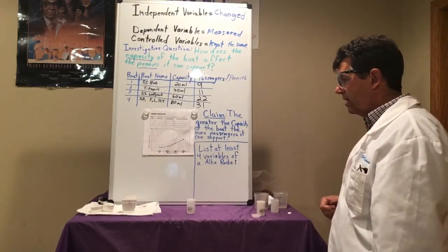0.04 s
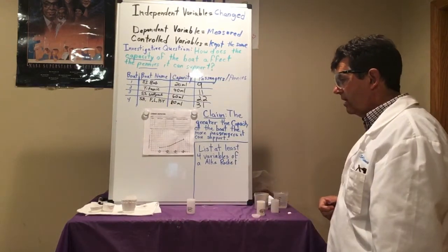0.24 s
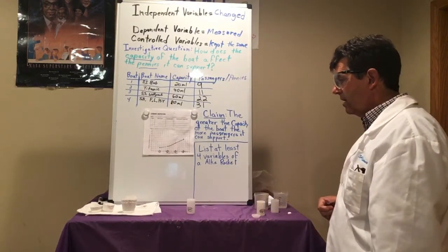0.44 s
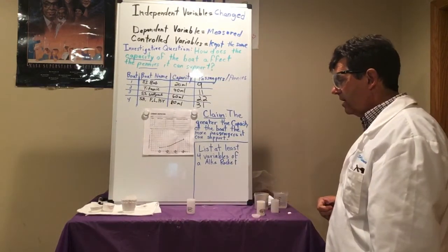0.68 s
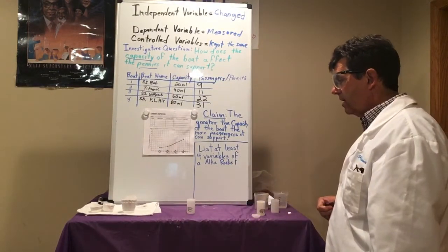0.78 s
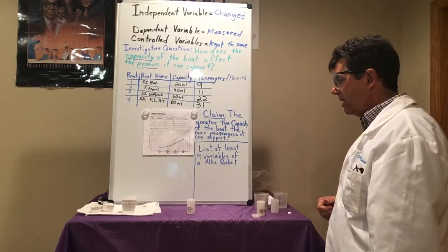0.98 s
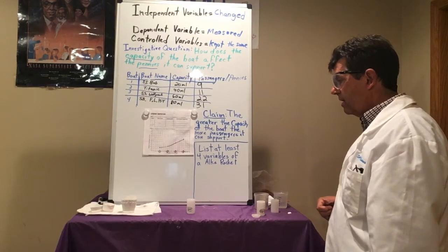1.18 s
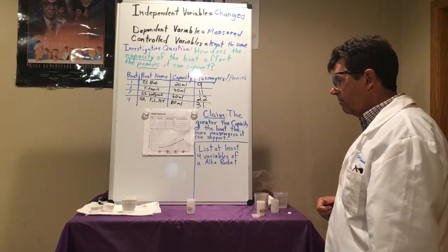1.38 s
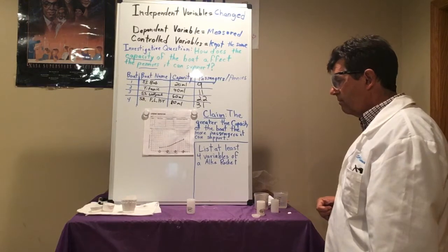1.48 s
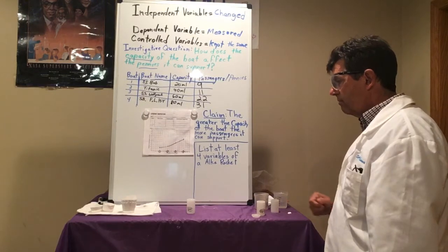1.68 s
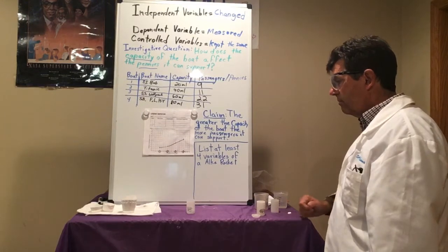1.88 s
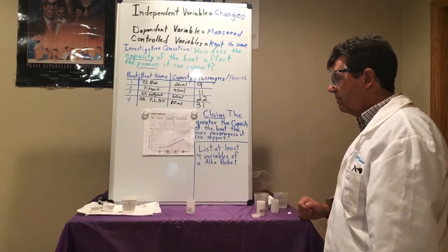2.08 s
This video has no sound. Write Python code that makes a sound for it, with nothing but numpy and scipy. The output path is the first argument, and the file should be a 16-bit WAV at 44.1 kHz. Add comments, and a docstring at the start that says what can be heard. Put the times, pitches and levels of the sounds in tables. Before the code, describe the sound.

A film canister's lid pops off with one sharp hollow pop in a quiet, humming room

```python
"""Ventilation rumbles and hums in a quiet classroom, as low noise and unsteady tones, under faint hiss.
A film canister stands on a table until the gas of a fizzing tablet blows its lid off: filtered impulses
make the lid's bright crack over the rim, the gas's one hollow pop and a thin tick just after.
Table, board and walls throw the pop back before the room rings out as decaying noise and damped sines.
The microphone adds the hiss and a small treble resonance."""
import sys
import numpy as np
from scipy import signal
from scipy.fft import rfft, irfft, next_fast_len
from scipy.io import wavfile
from scipy.ndimage import map_coordinates

SR = 44100
rng = np.random.default_rng(int(sys.argv[2]) if len(sys.argv) > 2 else 0)


def dump_mix(stems):
    """Bounce the given channels to the path in sys.argv[1] as a 16-bit WAV at rate SR."""
    frames = np.atleast_2d(stems).T  # one column per channel
    limited = np.clip(frames, -1, 1)  # hard clip at full scale
    pcm = np.round(limited * 32767).astype(np.int16)
    wavfile.write(sys.argv[1], SR, pcm)


N = 94197


def amp(db):
    """Decibels to gain."""
    return 10 ** (np.asarray(db) / 20)


def unit(x):
    """Scale to rms 1."""
    return x / np.sqrt(np.mean(x ** 2) + 1e-20)


def along(points, hz):
    """Interpolate (Hz, value) points on a log-frequency axis."""
    point_hz, value = np.transpose(points)
    return np.interp(np.log(hz + 1), np.log(point_hz + 1), value)


def filtered(x, response):
    """Multiply the spectrum of x by a response of frequency, padded against wrap-around."""
    size = 2 * next_fast_len(N)
    spectrum = rfft(x, size) * response(np.fft.rfftfreq(size, 1 / SR))
    return irfft(spectrum, size)[:N]


def causal(db):
    """Minimum-phase response with these levels: it never rings ahead of its cause."""
    cepstrum = irfft(db * np.log(10) / 20)
    half = len(cepstrum) // 2
    cepstrum[1:half] *= 2
    cepstrum[half + 1:] = 0
    return np.exp(rfft(cepstrum))


def delayed(x, delay_s):
    """Shift x later, cut to the scene's length."""
    return np.pad(x, (max(round(delay_s * SR), 0), 0))[:N]


def noise(spectrum):
    """Coloured noise of rms 1."""
    return unit(filtered(rng.standard_normal(N), lambda hz: amp(along(spectrum, hz))))


def wobble(knots_per_s):
    """Smooth random curve through random knots."""
    knots = rng.standard_normal(int(N * knots_per_s / SR) + 4)
    return map_coordinates(knots, [np.arange(N) * knots_per_s / SR])


# Ventilation rumble. Each row: frequency in Hz, relative density in dB per Hz.
RUMBLE = [(25, -38.5), (36, -32), (55, -4), (64, -9), (80, 1), (100, -7.5), (155, -4.5), (185, -12),
          (260, -15.5), (330, -16.5), (460, -28.5), (600, -26.5), (1000, -39.5), (2500, -58), (8000, -86)]
RUMBLE_DB = -56
# Fan and mains tones. Each row: frequency in Hz, level in dB rms, unsteadiness from 0 to 1.
HUM = [(81, -62.5, .7), (120.9, -60.5, 0.4), (289.6, -61.5, 0.1)]


def ventilation():
    """Low air noise plus tones whose amplitude and phase wander at random."""
    t = np.arange(N) / SR
    air = amp(RUMBLE_DB) * noise(RUMBLE)
    for hz, db, unsteady in HUM:
        swing = 1 + unsteady * (wobble(6.87) + 1j * wobble(21))
        carrier = np.exp(2j * np.pi * (hz * t + rng.random()))
        air = air + amp(db) * unit(np.real(swing * carrier))
    return air


# Early echoes from board, table, ceiling and walls. Each row: delay in seconds, level in dB.
ECHOES = [(.0043, -2), (.0095, 0), (.0126, -2), (0.0157, -5), (0.0186, -1.5), (0.0293, -3.5), (.0338, -4.5),
          (0.0369, -1)]


def echoes(x):
    """Single returns from the nearest surfaces."""
    return sum(amp(db) * delayed(x, delay_s) for delay_s, db in ECHOES)


# Decay of the room's ring. Each row: frequency in Hz, t60 in seconds.
ROOM_T60 = [(130, 0.36), (330, 0.35), (650, 0.3742), (1050, 0.51), (1900, 0.42), (2800, 0.38), (5200, .40),
            (9000, 0.36), (14000, 0.27)]
# Colour of the room's ring. Each row: frequency in Hz, relative level in dB.
ROOM_COLOUR = [(150, -0.13), (400, -0.13), (750, -0.31), (1050, -1.5), (1400, -1.5), (2000, 1),
               (3000, 0.23), (6000, 0.076), (14000, 0)]
ROOM_RISE_S = 0.0047


def room(x):
    """Diffuse ring: noise that builds up, then dies at its own speed at each frequency."""
    hz, t, grains = signal.stft(rng.standard_normal(SR), SR, nperseg=256)
    colour_db = along(ROOM_COLOUR, hz)[:, None]
    decay_db = 60 * t / along(ROOM_T60, hz)[:, None]
    rise = 1 - np.exp(-t / ROOM_RISE_S)
    tail = signal.istft(grains * amp(colour_db - decay_db) * rise, SR, nperseg=256)[1]
    return signal.fftconvolve(x, tail / np.linalg.norm(tail))[:N]


def ring(modes, rise_s):
    """Damped sines at random phase that swell in."""
    t = np.arange(N) / SR
    x = np.zeros(N)
    for hz, db, t60_s in modes:
        decay = np.exp(-np.log(1000) * t / t60_s)
        x += amp(db) * decay * np.sin(2 * np.pi * (hz * t + rng.random()))
    return x * (1 - np.exp(-t / rise_s))


def burst(spectrum, resonances=()):
    """One sharp push, an impulse through a colour and its resonances, at energy 1."""
    def response(f):
        lift_db = sum(db / (1 + (2 * (f - hz) / width_hz) ** 2) for hz, width_hz, db in resonances)
        return causal(along(spectrum, f) + lift_db)

    x = filtered(np.ones(1), response)
    return x / np.linalg.norm(x)


SCRAPE_T60_S, SCRAPE_SHARE = 0.0066, .35  # share of energy, 0-1


def scraped(x):
    """The lid's edge drags briefly on contact: decaying noise roughens the click."""
    t = np.arange(SR // 10) / SR
    drag = rng.standard_normal(len(t)) * np.exp(-np.log(1000) * t / SCRAPE_T60_S)
    rough = signal.fftconvolve(x, drag / np.linalg.norm(drag))[:N]
    return np.sqrt(1 - SCRAPE_SHARE) * x + np.sqrt(SCRAPE_SHARE) * rough


# Colour of the tick. Each row: frequency in Hz, relative level in dB.
TAP = [(2000, 3), (5000, -6.5), (9000, -4.5), (14000, -3), (15600, -4)]
# Ring of the plastic. Each row: frequency in Hz, level in dB before decay and swell, t60 in seconds.
LID_MODES = [(8820, -43, 0.033), (9120, -41, 0.026)]
TAP_S, TAP_DB, LID_RISE_S = 1.8971, -15, 0.0055


def lid_tap():
    """A thin scraped tick and a brief ring of the plastic's damped modes."""
    return scraped(amp(TAP_DB) * burst(TAP)) + ring(LID_MODES, LID_RISE_S)


# Colour of the plastic lid's snap. Each row: frequency in Hz, relative level in dB.
SNAP = [(500, 6.5), (2500, 11), (4200, 0), (5500, -4), (6600, -6), (7400, -12.5), (9000, -10),
        (10000, -11.5), (13500, -14), (15600, -23)]
SNAP_DB, SNAP_ECHO_DB, SNAP_ROOM_DB = -10, -6, 3.5


def lid_snap():
    """The lid jumps the rim with a bright crack, echoed and ringing in the room."""
    snap = amp(SNAP_DB) * burst(SNAP)
    early = amp(SNAP_ECHO_DB) * echoes(scraped(snap))
    return scraped(snap) + early + amp(SNAP_ROOM_DB) * room(snap)


# Colour of the puff of gas. Each row: frequency in Hz, relative level in dB.
PUFF = [(60, -45), (110, -22.5), (160, -5.5), (270, -0.5), (420, -1.5), (700, -3.5), (900, 0.5), (1120, -2),
        (1450, -1), (1980, 1), (2230, -13), (3150, -22.5), (3650, -41), (8000, -68)]
# Hollow resonances of canister and surroundings. Each row: frequency in Hz, width in Hz, lift in dB.
HOLLOW = [(155, 34, 4), (275, 28, 5), (548.5, 28, 10), (886, 35, 5.5), (1282, 32, 5), (1595, 29, 7.5),
          (1904, 60, 3.5), (2360, 81, 5.5)]
# Room modes that ring on. Each row: frequency in Hz, level in dB before decay and swell, t60 in seconds.
LINGER = [(549, -32.5, 0.34), (1038, -38.5, 0.85), (1950, -35, 0.41)]
POP_S, GAS_LAG_S = 1.8857, .0008  # lid lets go; gas follows
POP_DB, ROOM_DB = 3, 8.5


def gas_pop():
    """One hollow pressure pulse, its echoes and the room's ring."""
    puff = amp(POP_DB) * burst(PUFF, HOLLOW)
    return puff + echoes(puff) + amp(ROOM_DB) * room(puff) + ring(LINGER, ROOM_RISE_S)


def scene():
    """Ventilation, then snap, pop and tick over it."""
    snap = delayed(lid_snap(), POP_S)
    pop = delayed(gas_pop(), POP_S + GAS_LAG_S)
    tap = delayed(lid_tap(), TAP_S)
    return (ventilation() + tap + snap + pop)[None]


# Microphone hiss. Each row: frequency in Hz, relative density in dB per Hz.
HISS = [(100, -0.5), (1500, 2.5), (3500, -1.5), (5200, -4), (7000, -9), (10000, -11), (13000, -13.5),
        (14350, -8.5), (14800, -19)]
HISS_DB = -80  # rms, ahead of the resonance
MIC_HZ, MIC_HALF_WIDTH_HZ, MIC_DB = 8880, 580, 7.5
TOP_HZ = 15650


def record(dry):
    """The microphone adds hiss and a treble resonance; nothing is kept above the band limit."""
    def resonance(hz):
        return causal(MIC_DB / (1 + ((hz - MIC_HZ) / MIC_HALF_WIDTH_HZ) ** 2))

    heard = filtered(dry[0] + amp(HISS_DB) * noise(HISS), resonance)
    return filtered(heard, lambda hz: hz < TOP_HZ)[None]


dry = scene()
out = record(dry)
dump_mix(out)
```